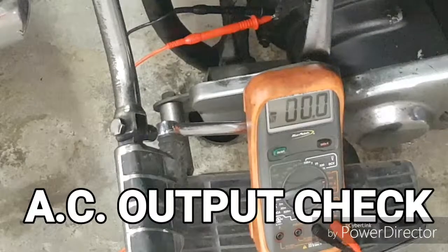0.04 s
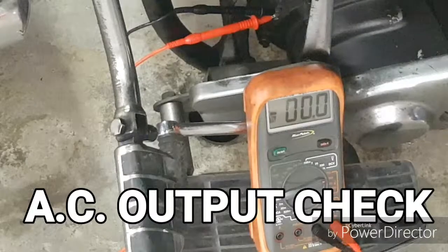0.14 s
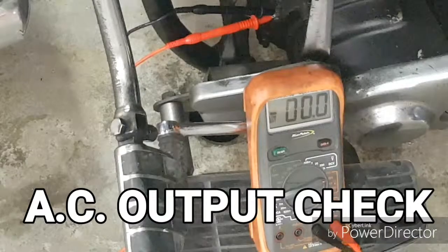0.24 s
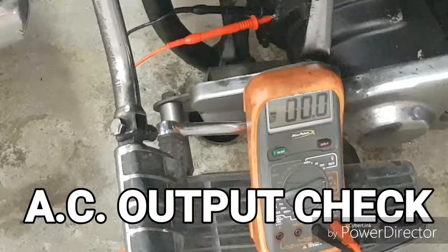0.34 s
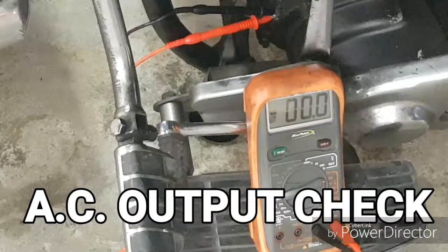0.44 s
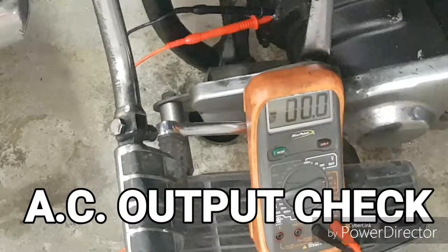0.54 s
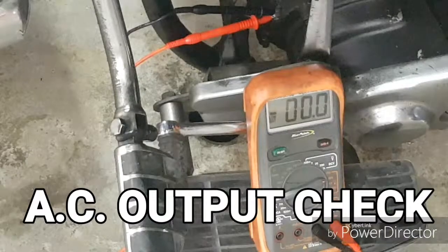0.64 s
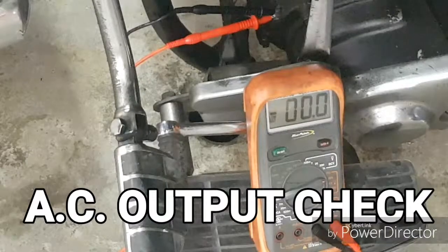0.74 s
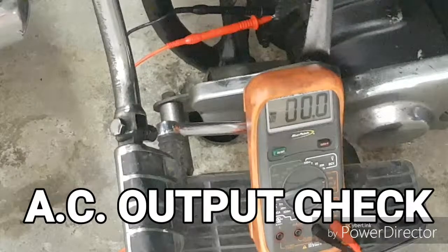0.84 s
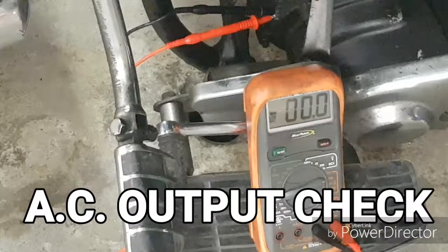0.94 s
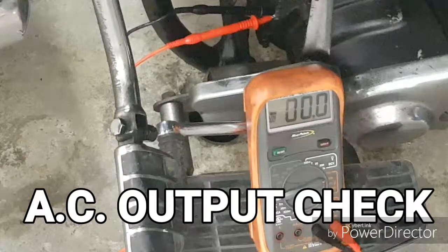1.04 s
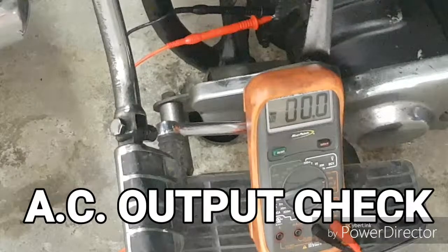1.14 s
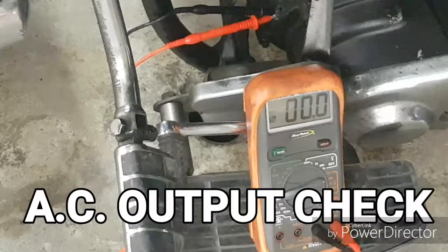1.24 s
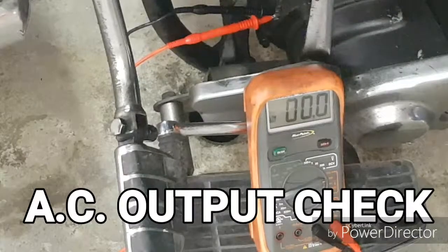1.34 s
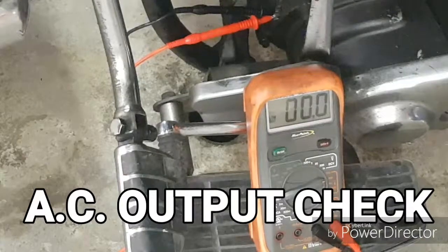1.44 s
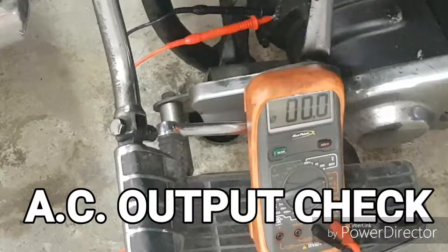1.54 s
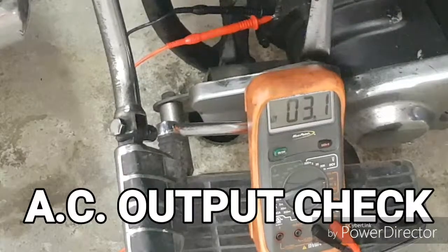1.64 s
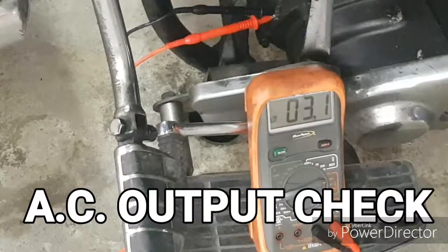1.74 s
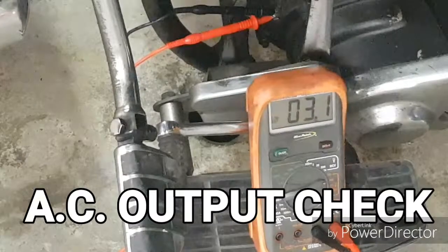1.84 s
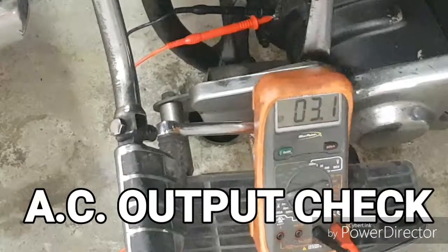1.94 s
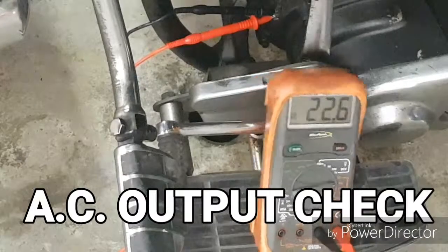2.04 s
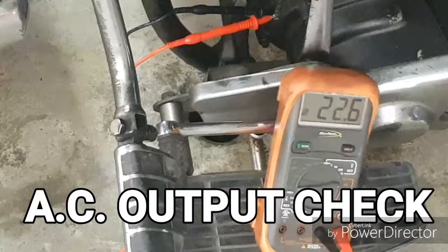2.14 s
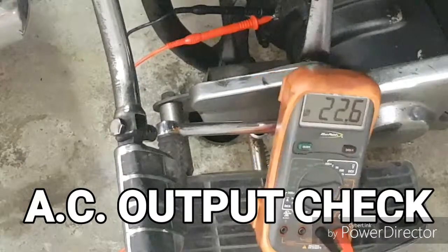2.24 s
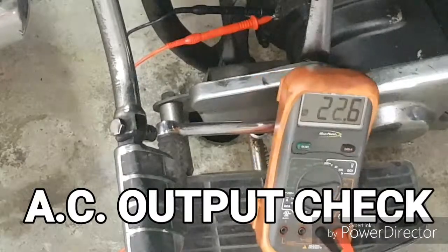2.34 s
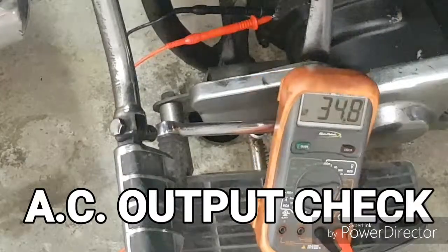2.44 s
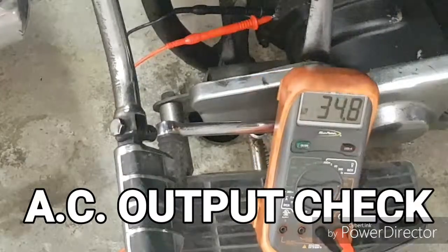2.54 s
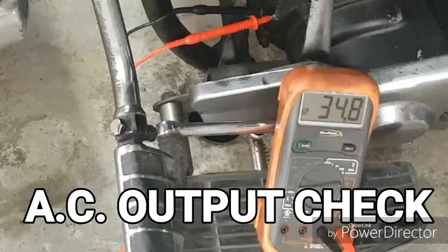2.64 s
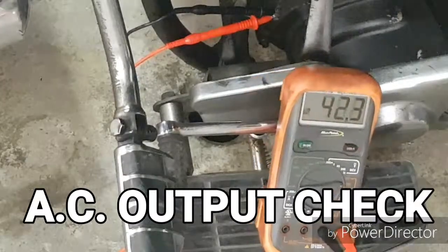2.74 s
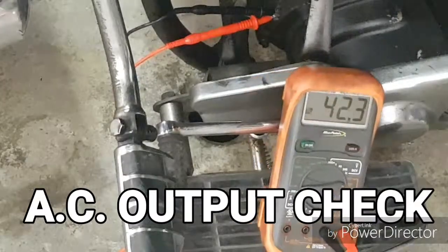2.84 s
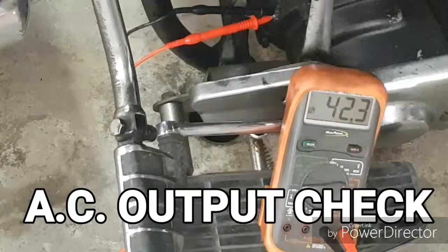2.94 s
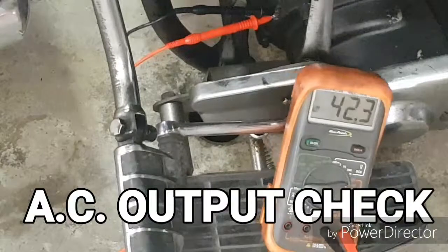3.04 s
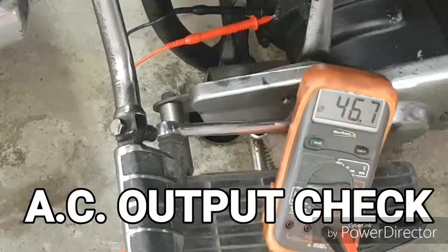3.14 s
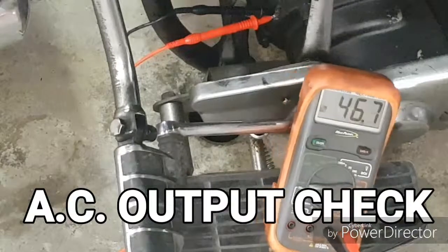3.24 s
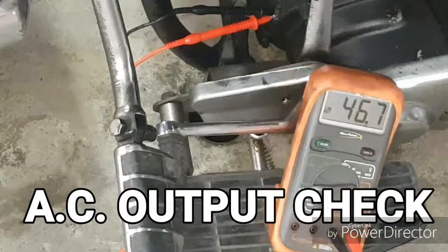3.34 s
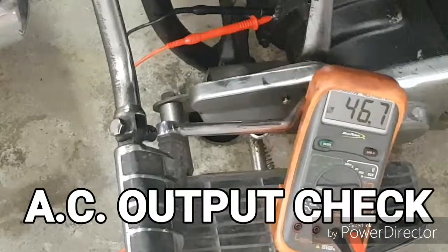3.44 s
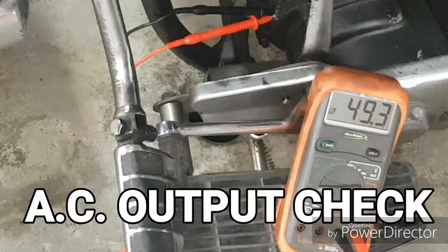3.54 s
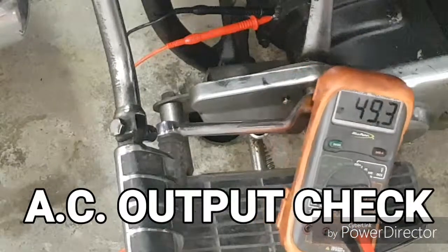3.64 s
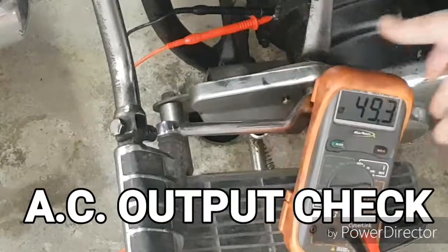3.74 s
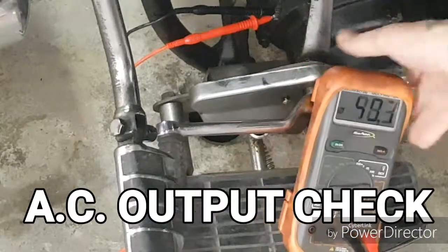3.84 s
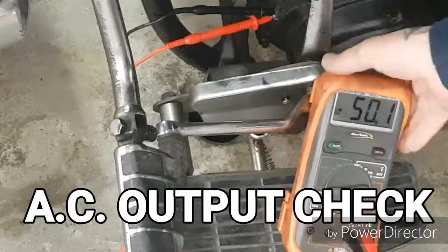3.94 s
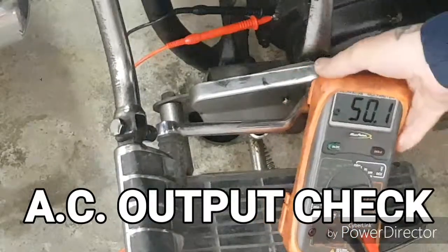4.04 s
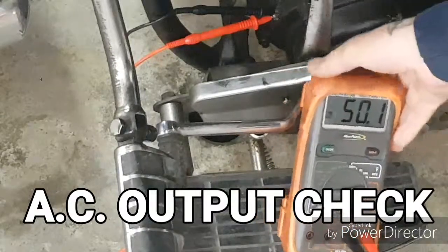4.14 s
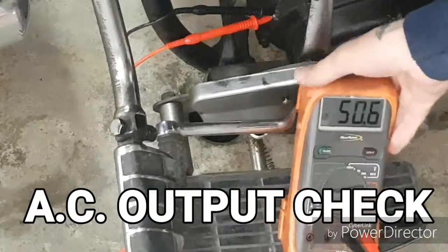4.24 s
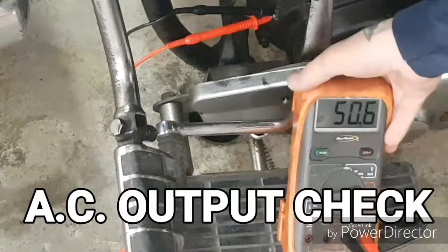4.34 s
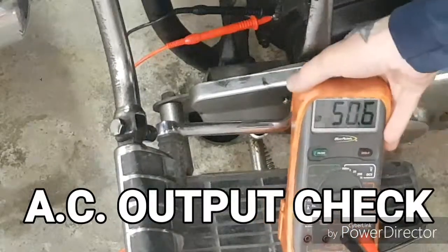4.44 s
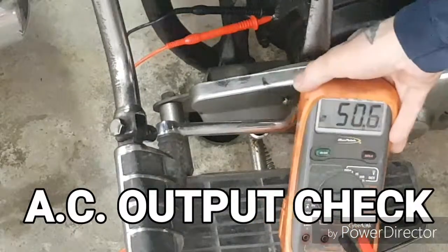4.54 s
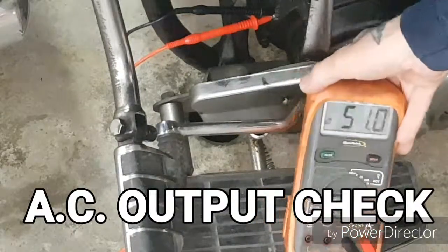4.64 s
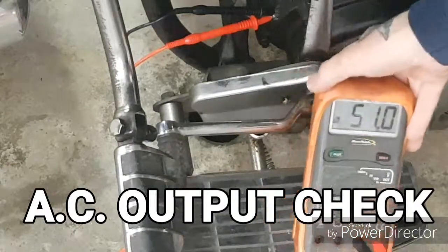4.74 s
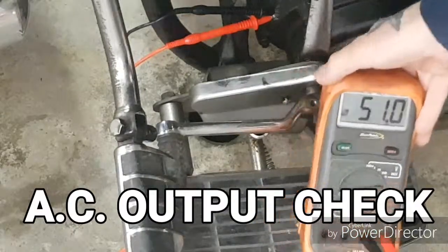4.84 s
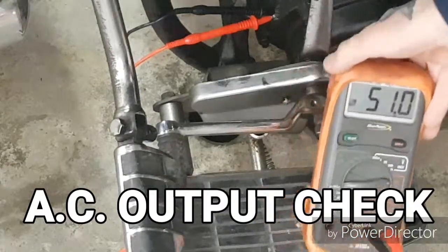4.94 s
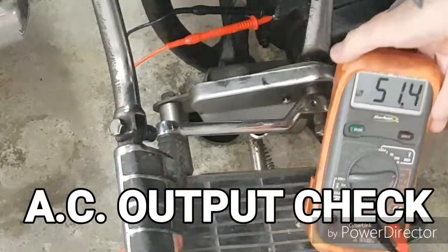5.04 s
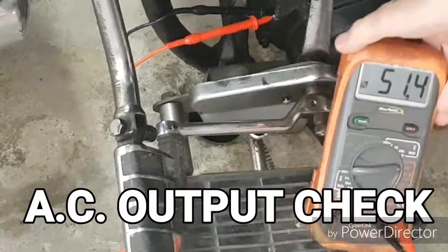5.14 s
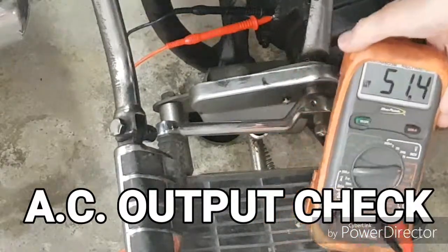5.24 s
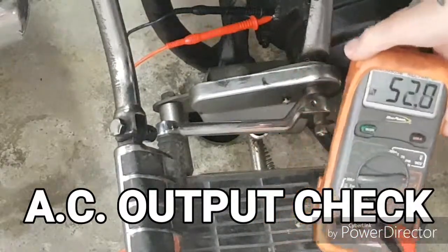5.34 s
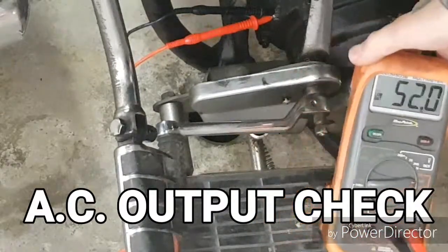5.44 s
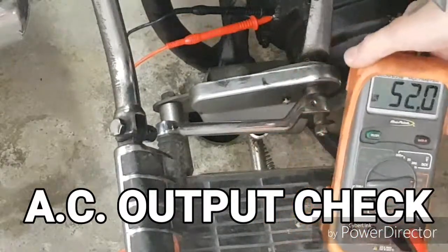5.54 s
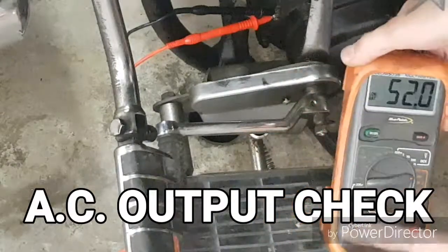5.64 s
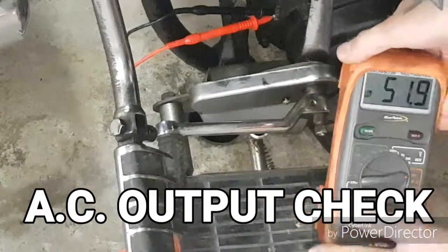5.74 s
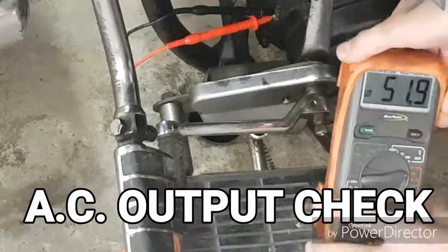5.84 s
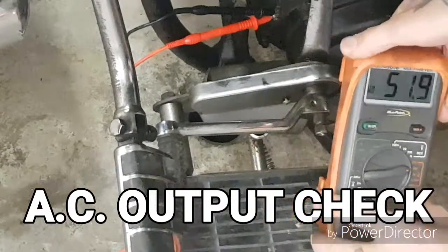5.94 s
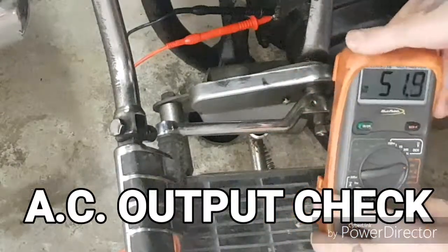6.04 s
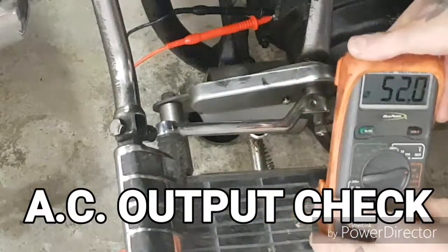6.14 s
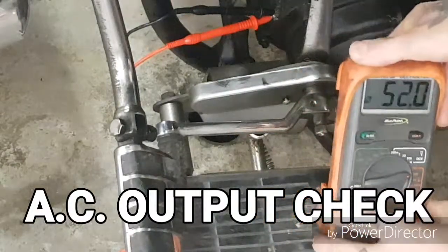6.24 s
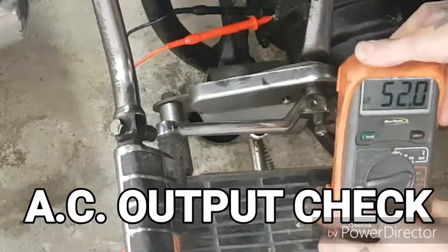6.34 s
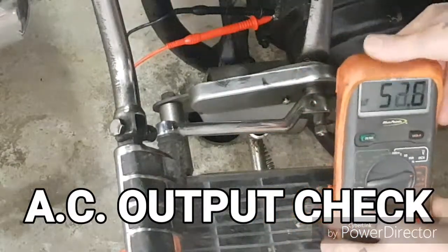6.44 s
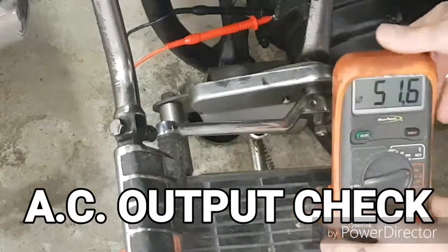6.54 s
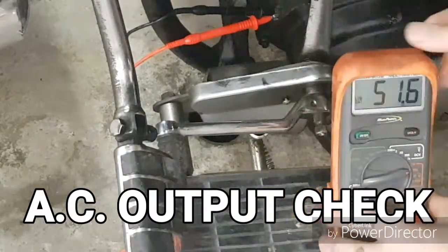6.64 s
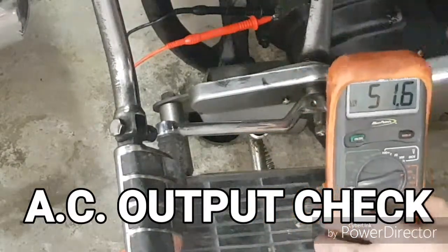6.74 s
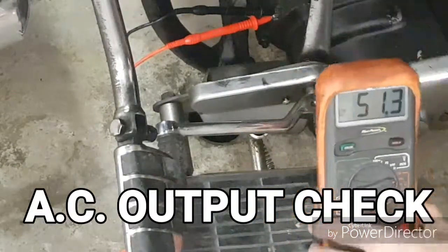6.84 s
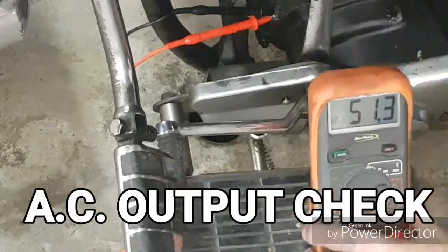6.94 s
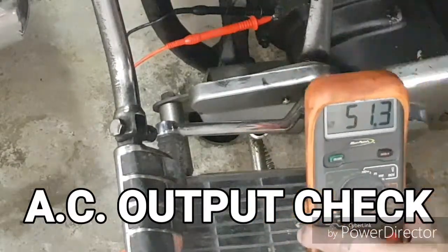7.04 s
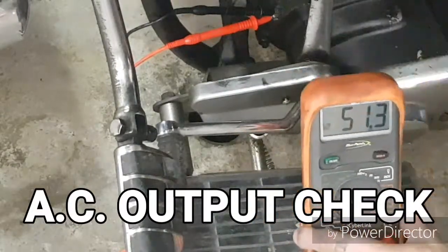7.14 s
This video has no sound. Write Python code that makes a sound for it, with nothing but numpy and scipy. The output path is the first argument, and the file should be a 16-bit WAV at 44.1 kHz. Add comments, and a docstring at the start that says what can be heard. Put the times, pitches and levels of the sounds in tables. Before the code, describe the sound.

For the first 1.15 seconds there is only a quiet garage: low mains hum, still air and a faint fading noise. At about 1.2 a hard double metallic clack engages the starter, which grinds coarsely and growls, its whine dropping under compression and rising again near 1.45 with a short scraping squeal. At 1.65 the four-cylinder motorcycle engine catches with sharp cracks and uneven low thumps, stumbling near 2.0 and 2.3 while air gulps loudly at the intake. Revs climb quickly until about 3.1, then creep up to a fast idle. Deep exhaust boom and drone throb under steady valve clatter, chain ticks, buzzing brackets, ringing covers and hiss. Small irregular firings and knocks come around 5.8 and 6.5, and the speed eases slightly until the sound ends, still running, at about 7.2. Two close microphones, with short wall echo.

```python
"""A four-cylinder motorcycle starts up in a quiet, humming garage, with two microphones close beside the engine.
Uneven firings ring the silencers, while valve gear and chains clatter in the engine case.
The starter clacks in, grinds and whines; the engine catches, stumbles and climbs to a fast idle.
Filtered noise and resonances make the metal, decaying noise the walls, and sines the mains hum."""
import sys
import numpy as np
from scipy import signal
from scipy.fft import rfft, irfft
from scipy.io import wavfile
from scipy.ndimage import uniform_filter1d

SR = 44100
rng = np.random.default_rng(int(sys.argv[2]) if len(sys.argv) > 2 else 0)


def master(y):
    """Save y as 16-bit WAV."""
    cut = np.clip(np.atleast_2d(y).T, -1, 1)
    pcm = np.round(cut * 32767)  # scale
    wavfile.write(sys.argv[1], SR, pcm.astype(np.int16))


N = 317520
TIME = np.arange(N) / SR
FREQ = np.fft.rfftfreq(N, 1 / SR)
CATCH_S = 1.65  # the engine begins to fire

# Engine speed. Each row: time in seconds, four-stroke cycles per second.
ENGINE_SPEED = [(1.65, 8.5), (1.75, 10.7), (1.95, 11.85), (2.12, 11.39), (2.57, 15.12), (2.9, 15.76),
                (3.1, 16.71), (5.05, 17.53), (5.7, 17.55), (6.65, 17.3), (6.9, 17.02), (7.2, 16.93)]
# The firings of one cycle. Each row: place in the cycle from 0 to 1, relative push;
# the far silencer is heard in opposite phase.
FIRINGS = [(.12, -.28), (.37, -.16), (.62, 1.0), (.87, .32)]


def undb(db):
    """Decibels to gain."""
    return 10 ** (np.asarray(db) / 20)


def unit(x):
    """Scale to rms 1."""
    return x / np.sqrt(np.mean(x ** 2))


def steady(x):
    """Scale to rms 1 over every few engine cycles."""
    return x / np.sqrt(uniform_filter1d(x ** 2, size=7700) + 1e-12)


def noise(*channels):
    """White noise of rms 1, independent in each channel."""
    return rng.standard_normal((*channels, N))


def curves(table):
    """Each column of a table, joined by straight lines in time."""
    seconds, *columns = np.transpose(table)
    return [np.interp(TIME, seconds, column) for column in columns]


def colour(points):
    """Causal (minimum-phase) response with the given outline of Hz and dB."""
    hz, db = np.transpose(points)
    outline_db = np.interp(np.log(FREQ + 1), np.log(hz), db)
    # folding the cepstrum forward in time gives the causal phase
    cepstrum = irfft(np.log(undb(outline_db)), N)
    cepstrum[1:N // 2] *= 2
    cepstrum[N // 2 + 1:] = 0
    return np.exp(rfft(cepstrum))


def resonance(hz, width):
    """Band-pass response, gain 1 at the centre."""
    return 1j * FREQ * width / (hz ** 2 - FREQ ** 2 + 1j * FREQ * width)


def through(x, response):
    """Filter by a frequency response."""
    return irfft(rfft(x) * response, N)


def walk(rate):
    """Smooth random wandering with rms 1, taking a new value at the given rate in Hz."""
    k = max(int(SR / rate), 1)
    steps = np.repeat(rng.standard_normal(N // k + 1), k)[:N]
    return unit(uniform_filter1d(steps, k))


def strikes(turns, places, sizes):
    """A pulse each time the running count of turns passes one of the places."""
    at = np.interp(places, turns, np.arange(N), left=-1, right=-1).ravel()
    heard = (at >= 0) & (at < N - 1)
    at, sizes = at[heard], sizes.ravel()[heard]
    # each pulse is shared between the two samples around it
    i = at.astype(int)
    return np.bincount(i, sizes * (1 - at + i), N) + np.bincount(i + 1, sizes * (at - i), N)


def ring(x, t60):
    """Dense ringing as decaying noise, different at each of the two microphones."""
    t = TIME[:SR // 2]
    tail = rng.standard_normal((2, len(t))) * np.exp(-np.log(1000) * t / t60)
    tail = tail[:, :int(2 * t60 * SR)]
    tail = tail / np.sqrt(np.sum(tail ** 2, 1, keepdims=True))
    return signal.oaconvolve(x * np.ones((2, 1)), tail, axes=1)[:, :N]


def fade_in(start, length):
    """Nothing before the start, then a straight rise to 1."""
    return np.clip((TIME - start) / length, 0, 1)


def spell(start, length, ramp):
    """Rises to 1 from the start, holds, and falls back once the length has passed."""
    return fade_in(start, ramp) - fade_in(start + length, ramp)


def since_catch():
    """Seconds for which the engine has been firing."""
    return np.maximum(TIME - CATCH_S, 0)


def settling(seconds):
    """1 until the engine catches, then dying away with this time constant."""
    return np.exp(-since_catch() / seconds)


def combustion(settle_s):
    """Scatter, boom and drone in dB: scatter settles with warmth, and all three shift in stumbles and surges."""
    # Stumbles and surges. Each row: start in seconds, length in seconds, then the change in dB
    # of the scatter, of the boom and of the drone.
    stumbles = [(1.66, 0.1, -1.5, -2, -5), (1.772, 0.2, -1.6, -2, 1.5), (1.952, 0.34, -.7, -.5, -3),
                (2.283, 0.7, -1.1, 1, 1.3), (3.5, 0.92, 0, -2, 2.1), (4.3, .65, .3, -2.5, 0),
                (5.785, .07, 3.5, -1, 0), (6.44, 0.36, 2.8, -1, 0), (6.8, .45, 0.3, -.5, 2)]
    scatter_db, boom_db, drone_db = sum(np.outer(changes, spell(start, length, 0.02))
                                        for start, length, *changes in stumbles)
    warm_db, cold_db = 0.85, 5.5
    return warm_db + cold_db * settling(settle_s) + scatter_db, boom_db - 28.5, drone_db - 24.5


def exhaust(turns, low_cut_hz=38, timing=0.0017, gas_per_scatter=5.3):
    """Four unequal firings a cycle ring the silencers; gas flutters through the same pipes."""
    # Silencer resonances, the first the deep boom. Each row: Hz, width in Hz, relative level in dB
    # (the boom is levelled apart from the others).
    pipe_modes = [(75.4, 9, 0), (129.3, 14, 0), (194.5, 6, -11.5), (208, 8, -23), (259, 8, -12.5),
                  (300, 10, -21.5), (328, 12, -26), (377, 12, -25), (478, 44, -27)]
    settle_s = 0.74
    place, push = np.transpose(FIRINGS)
    chance = rng.standard_normal((int(turns[-1]) + 1, 2, len(place)))
    places = np.arange(len(chance))[:, None] + place
    scatter_db, boom_db, drone_db = combustion(settle_s)
    scatter = np.interp(places, turns, scatter_db)
    # a stumbling engine fires unevenly in both strength and time, and blows more loose gas
    late = timing * scatter * chance[:, 0]
    pulses = strikes(turns, places + late, push + (undb(scatter) - 1) * chance[:, 1] / 2)
    gas = undb(-28 + gas_per_scatter * scatter_db) * noise()
    s = 1j * FREQ / low_cut_hz
    low_cut = s * s / (s * s + np.sqrt(2) * s + 1)
    blast = through(unit(pulses) + gas, low_cut)

    modes = [(-1) ** k * undb(db) * resonance(hz, width) for k, (hz, width, db) in enumerate(pipe_modes)]
    # the two pipes partly cancel each other at one pitch
    notch = 1 - 0.5 * resonance(156, 18)
    boom = steady(through(blast, modes[0] * notch))
    drone = steady(through(blast, sum(modes[1:]) * notch))
    # in one range of speed the silencers boom, at the cost of the drone
    boomy_speed, boomy_range = 16.45, 0.86  # cycles per second
    boomy = np.exp(-((curves(ENGINE_SPEED)[0] - boomy_speed) / boomy_range) ** 6)
    boom = boom * undb(boom_db + 4.5 * boomy)
    drone = drone * undb(drone_db - 1.5 * boomy)
    # a low shudder, heaviest while the engine is cold and slow
    rumble = unit(through(blast, resonance(52, 15) ** 2)) * undb(-43 + 10 * settling(settle_s))
    build_s = 0.1
    return (rumble + boom + drone) * np.sqrt(fade_in(CATCH_S, build_s))


def misfires():
    """Gain of the exhaust: it sags for a moment at each weak firing."""
    # Gaps in the throb. Each row: time in seconds, depth in dB.
    gaps = [(1.755, 4), (2.255, 5), (4.44, 2), (5.875, 0), (6.495, 4.5), (6.79, 4)]
    width_s = 0.018
    return undb(-sum(db * np.exp(-((TIME - s) / width_s) ** 2) for s, db in gaps))


def thumps():
    """An uneven firing swings the gas in the silencers for a few cycles."""
    # Single thumps. Each row: start in seconds, pitch in Hz, level in dB before rise and decay.
    uneven_firings = [(1.714, 124, -21), (1.718, 269, -17), (1.78, 260, -22.5), (1.97, 125, -12),
                      (2.318, 189, -21), (5.832, 158, -14), (6.522, 100, -13), (6.584, 190, -17)]
    rise_s, t60_s = 0.0043, 0.059
    out = np.zeros(N)
    for s, hz, db in uneven_firings:
        age = np.maximum(TIME - s, 0)
        envelope = fade_in(s, rise_s) * np.exp(-np.log(1000) * age / t60_s)
        out += undb(db) * envelope * np.sin(2 * np.pi * hz * age)
    return out


def puffs(pipes, hz=480, width_hz=600):
    """Gas chuffs at the tailpipes on every outward swing of the pressure."""
    gas = np.maximum(pipes, 0) * noise()
    return unit(through(gas, resonance(hz, width_hz) ** 2)) * undb(-43)


def rattle(turns, count, scatter_db, slack, t60, parts_db):
    """Parts that knock at their own places in every cycle, never quite alike."""
    own = rng.standard_normal((count, 2))
    chance = rng.standard_normal((int(turns[-1]) + 1, 2, count))
    own_places = (np.arange(count) + own[:, 0] / 4) / count
    places = np.arange(len(chance))[:, None] + own_places + slack * chance[:, 0]
    sizes = undb(parts_db * own[:, 1] + scatter_db * chance[:, 1])
    # neighbouring knocks come from different parts of the engine and ring differently
    return unit(sum(ring(strikes(turns, places[:, k::8], sizes[:, k::8]), t60) for k in range(8)))


def singing_covers(turns, buzz_db=-5):
    """Each cover rattles softly and coarsely all the time and sings out in spells."""
    # Covers that sing along with the gears. Each name: Hz, width in Hz of one stage, relative resting level in dB.
    covers = {"clutch": (755, 77, -55), "alternator": (1562, 125, -53.5), "valve": (2240, 960, -52),
              "chain": (496, 97, -55), "sump": (864, 120, -54), "side": (1445, 87, -52.5)}
    # Spells of singing. Each row: start in seconds, length in seconds, which cover, rise in dB.
    singing = [(2.43, 0.71, "clutch", 16.5), (4.8, 2.6, "alternator", 12.5), (5.05, 1.86, "valve", 7),
               (1.9, 0.515, "chain", 16.5), (4.4, .65, "chain", 12.5), (4.45, 1.7, "sump", 11),
               (2.95, 1.7, "side", 6), (6.6, .7, "side", 7)]
    knocks = rattle(turns, count=8, scatter_db=3.0, slack=0.01986, t60=0.015, parts_db=-1.5)
    drive = rfft(knocks + undb(buzz_db) * noise(2))
    out = 0
    for name, (hz, width, db) in covers.items():
        rise_db = sum(rise * spell(start, length, 0.087)
                      for start, length, cover, rise in singing if cover == name)
        out = out + unit(irfft(drive * resonance(hz, width) ** 2, N)) * undb(db + rise_db)
    return out


def machinery(turns, running, rush_db=-5, spray_db=1, throb_db=1.0, case_db=-1.58):
    """Valve gear knocks in the case, its covers and fins; chains tick above it; all swell once a cycle."""
    # Broad colour of the engine case. Each row: Hz, dB.
    case_colour = [(90, -25), (170, 0.5), (228, -11), (300, -2), (400, -8), (500, -13), (610, -12),
                   (820, -10.5), (1050, -15.5), (1250, -17.5), (1550, -16), (2400, -20), (3300, -26),
                   (5000, -32.5), (8000, -65.5)]
    # Resonances of the case. Each row: Hz, width in Hz, dB over the colour.
    case_modes = [(752, 68, -6), (1665, 31, -17)]
    # Cooling fins that ring all the while. Each row: Hz, width in Hz of one stage, dB relative to the clatter.
    fin_modes = [(1435, 14, -22.5), (2093, 29, -23.5), (3620, 70, -26.5), (4280, 32, -31)]
    # Fine hiss of chains and intake. Each row: Hz, dB.
    hiss_colour = [(2060, -22), (3500, -7), (5450, -7), (7670, -5), (9300, -12), (11600, -10),
                   (14600, -12.5), (15500, -16.5)]
    # Spells of harder rattling. Each row: start in seconds, length in seconds, rise in dB.
    rattling = [(1.921, 0.14, 0.5), (2.257, 0.31, 1.5), (4.585, 2.2, 0.64)]

    # slow rises in dB per second as the engine warms, and a surplus that fades as the oil arrives
    oil = settling(0.37)
    clatter_db = -29.5 + 0.0139 * since_catch() + 6 * oil
    hiss_db = -49.5 + 0.47 * since_catch() + 9 * oil
    rattling_db = sum(rise_db * spell(start, length, 0.043) for start, length, rise_db in rattling)
    throb = throb_db * np.cos(2 * np.pi * (turns - .4))

    knocks = rattle(turns, count=20, scatter_db=2.0, slack=0.0051, t60=0.048, parts_db=1.14)
    knocks = knocks + undb(rush_db) * noise(2)
    ticks = rattle(turns, count=32, scatter_db=3.2, slack=.005, t60=.02, parts_db=1.2)
    ticks = ticks + undb(spray_db) * noise(2)

    resonances = sum(undb(db) * resonance(hz, width) for hz, width, db in case_modes)
    case = undb(case_db) * unit(through(knocks, colour(case_colour) * (1 + resonances)))
    fins = sum(undb(db) * unit(through(knocks, resonance(hz, width) ** 2)) for hz, width, db in fin_modes)
    body = (case + fins) * undb(clatter_db + rattling_db)
    hiss = unit(through(ticks, colour(hiss_colour))) * undb(hiss_db + rattling_db)
    return (body + singing_covers(turns) + hiss) * undb(throb) * running


def intake(turns, hz=390, width=330, gulp_db=4):
    """The carburettors gulp air once for every cylinder, loudest while the engine picks up."""
    air = unit(through(noise(), resonance(hz, width) ** 2))
    gulps = np.cos(2 * np.pi * len(FIRINGS) * turns) - 1.5
    return air * undb(-42 + 11.5 * settling(0.95) + gulp_db * gulps)


def loose_parts(turns, scatter_db=2.5):
    """Brackets and shields, each with its own note, are shaken twice a cycle; now one rings out, now another."""
    # Notes of the loose brackets and shields. Each row: Hz, width in Hz, relative level in dB.
    loose_notes = [(471, 25, -2), (518, 32, -4.5), (690, 53, -4), (753, 19, 2), (868, 54, -2),
                   (947, 27, -1.5), (1026, 34, -2), (1350, 62, -4), (1486, 51, -5), (1688, 23, -4.5),
                   (1793, 37, -14), (2030, 44, -9.5), (2200, 70, -8.5), (2455, 63, -10)]
    out = np.zeros((2, N))
    for hz, width, db in loose_notes:
        chance = rng.standard_normal((2 * int(turns[-1]) + 2, 3))
        places = (np.arange(len(chance)) + rng.random() + .08 * chance[:, 0]) / 2
        peak = signal.iirpeak(hz, hz / width, SR)
        for side in range(2):
            blows = strikes(turns, places, undb(scatter_db * chance[:, 1 + side]))
            out[side] += undb(db) * unit(signal.lfilter(*peak, blows))
    return unit(out) * undb(-41)


def starter(grit_db=2, tooth_db=3, housing_t60=0.035, housing_ring_db=-4):
    """The starter's gears grind and growl under compression, squeal as they run free, and sink as the engine fires."""
    # Compressions drag the starter down. Each row: time in seconds, gear mesh rate in Hz,
    # level of the whine in dB before the housing and its ring.
    mesh = [(1.208, 1002, -50), (1.219, 975, -28), (1.235, 900, -44), (1.25, 520, -35), (1.28, 430, -38),
            (1.315, 530, -37), (1.365, 390, -41), (1.4, 560, -38), (1.44, 902, -52), (1.458, 948, -31.5),
            (1.497, 980, -26.5), (1.507, 915, -36), (1.517, 870, -29), (1.545, 915, -32), (1.56, 975, -34),
            (1.574, 992, -28.5), (1.595, 950, -29.5), (1.606, 830, -38), (1.618, 735, -33),
            (1.66, 500, -44)]
    # Partials of the whine. Each row: multiple of the mesh rate, relative level in dB.
    whine_partials = [(1, 3.5), (2, 0), (3, -15), (4, -21), (7, -25)]
    # Colour of the grinding. Each row: Hz, dB.
    grind_colour = [(50, -18), (100, -9.5), (220, -3.5), (470, -2.5), (700, -5), (1000, -7.5), (1700, -3.5),
                    (2400, -12), (3300, -22), (5300, -30.5), (7000, -28), (9200, -40), (15000, -46)]
    bite_s, bite_rise_s, release_s, release_fall_s = 1.188, 0.039, 1.65, 0.059
    squeal_s, squeal_length_s = 1.445, 0.183  # the starter clutch squeals just before the catch

    mesh_hz, whine_db = curves(mesh)
    phase = 2 * np.pi * np.cumsum(mesh_hz * (1 + 0.021 * walk(700))) / SR
    # teeth never meet twice alike, so the upper partials break up into bands of noise
    teeth = 0
    for k, db in whine_partials:
        roughness = 0.36 + 0.2 * (k - 1)
        flutter = 1 + roughness * (walk(170) + 1j * walk(170))
        teeth = teeth + undb(db) * np.real(np.exp(1j * round(k) * phase) * flutter)
    teeth = unit(teeth) * undb(whine_db)
    # the housing rings when the mesh rate passes its note
    whine = through(teeth, 1 + undb(-14) * resonance(950, 51))
    housing = undb(housing_ring_db) * ring(teeth, housing_t60)

    grit = noise(2) * undb(grit_db * walk(400) + tooth_db * np.cos(phase))
    grind = unit(through(grit, colour(grind_colour)))
    # the grinding eases after the first bite and partly comes back with the squeal
    squealing = spell(squeal_s, squeal_length_s, 0.02)
    eased = fade_in(bite_s, squeal_s - bite_s) - 0.29 * squealing
    grind = grind * undb(-28 - 4 * eased)
    scrape = unit(through(noise(2) * undb(grit_db * walk(330)), resonance(2620, 1660) ** 2))
    scrape = scrape * undb(-37) * squealing
    engaged = fade_in(bite_s, bite_rise_s) * (1 - fade_in(release_s, release_fall_s))
    return (grind + scrape + whine + housing) * engaged


def clacks(t60=0.061, attack=0.0016, trim_db=-8.0):
    """Short metallic blows: a dull ring of the case and a bright crack."""
    # Clacks of the solenoid, starter clutch, rough firings and slack chains.
    # Each row: start in seconds, level in dB before the trim, brightness in dB.
    metal_blows = [(1.169, -42.5, -5), (1.179, -38, -1), (1.19, -30, -4), (1.195, -16.5, -11),
                   (1.215, -15.5, -9), (1.234, -25.5, 5), (1.386, -29, 2), (1.448, -20, -17),
                   (1.657, -21, -10), (1.678, -20.5, -1), (1.703, -20, -1), (1.727, -21, 7.5),
                   (1.74, -23, 4), (1.861, -26, -7), (1.917, -29, 8), (1.983, -17, -11), (1.999, -23, 1),
                   (2.087, -28, 8), (2.175, -34.5, 12), (2.511, -26, -7), (4.899, -24, -8),
                   (5.734, -24, -9), (6.273, -24, -8), (6.464, -22, -9), (6.575, -15, -7), (6.678, -24, -5),
                   (6.752, -22, -10)]
    dull, bright = np.zeros(N), np.zeros(N)
    for s, db, bright_db in metal_blows:
        decay = np.exp(-np.log(1000) * np.maximum(TIME - s, 0) / t60)
        blow = undb(db + trim_db) * fade_in(s, attack) * decay
        dull += blow
        bright += blow * undb(bright_db)
    case = unit(through(noise(2), resonance(1380, 2070) ** 2))
    crack = unit(through(noise(2), resonance(2600, 2800) ** 2 + resonance(4700, 5900) ** 2))
    return dull * case + 0.5 * bright * crack


def garage(tail_db=-62, tail_db_per_s=70):
    """Mains hum, its upper partials wavering, over still air and a low drone; a faint noise fades at first."""
    # Mains hum. Each row: Hz, relative rms level in dB.
    hum_partials = [(120, -80), (240, -71.5), (360, -94), (480, -90), (540, -98), (600, -93), (720, -87.5),
                    (840, -95), (1080, -91), (1440, -89), (2160, -93)]
    # Colour of the still air. Each row: Hz, dB.
    air_colour = [(15, -40), (25, -4), (49, -4), (118, -3.5), (186, -8), (237, -9), (286, -10.5),
                  (427, -18.5), (709, -22), (903, -25.5), (1460, -24), (3500, -31.5), (8780, -44),
                  (15000, -41)]
    hum = 0
    for hz, db in hum_partials:
        waver_db = 0.8 * hz / 1000 * walk(9)
        hum = hum + np.sqrt(2) * undb(db + waver_db) * np.sin(2 * np.pi * (hz * TIME + rng.random()))
    air = unit(through(noise(2), colour(air_colour))) * undb(-69.5 + walk(5.5))
    drone = unit(through(noise(), resonance(110, 12))) * undb(-77)
    tail = unit(through(noise(2), resonance(970, 3600) ** 3)) * undb(tail_db - tail_db_per_s * TIME)
    return hum + air + drone + tail


def close_pair(x, apart_hz=900, side_db=0.0, lean_db=2.0, cross_hz=6500):
    """Two close microphones share the bass; the left hears more middle, the right more top."""
    width = undb(side_db) * FREQ / np.hypot(FREQ, apart_hz)
    mid = 0.98 * (x[0] + x[1]) / np.sqrt(2)
    side = through((x[0] - x[1]) / np.sqrt(2), width)
    lean = lean_db * np.tanh((cross_hz - FREQ) / 1500) * FREQ / (FREQ + 200)
    return np.array([through(mid + side, undb(lean / 2)), through(mid - side, undb(-lean / 2))])


def scene(room_db=-8, exhaust_db=0, metal_db=-0.83, pipe_room_db=-14, wobble=0.00084, garage_db=-1.5):
    """Engine, starter and garage together, with the bike echoing off the walls."""
    # the crank never turns quite evenly
    turns = np.cumsum(curves(ENGINE_SPEED)[0]) / SR + wobble * walk(30)
    running = fade_in(CATCH_S, 0.01)
    # the silencers round off the strongest pulses
    pipes = undb(exhaust_db) * np.tanh(3 * (exhaust(turns) * misfires() + thumps())) / 3
    pipes = pipes + puffs(pipes)
    metal = machinery(turns, running) + (intake(turns) + loose_parts(turns)) * running
    metal = undb(metal_db) * (metal + starter() + clacks())
    garage_t60_s = 0.37
    walls = ring(undb(room_db) * metal + undb(pipe_room_db) * pipes, garage_t60_s)
    # the exhaust reaches the right microphone a moment before the left
    delay_s = 0.00017
    pipes = np.array([through(pipes, np.exp(-2j * np.pi * FREQ * delay_s)), pipes])
    bike = pipes + close_pair(metal + walls, apart_hz=1240)
    switched_on = fade_in(1.15, .01)  # the bike is silent until then
    return bike * switched_on + close_pair(undb(garage_db) * garage())


def record(dry):
    """The recorder cuts the deepest bass and the top."""
    dry = signal.sosfilt(signal.butter(2, 14, "high", fs=SR, output="sos"), dry)
    return signal.sosfilt(signal.ellip(10, .2, 80, 15550, fs=SR, output="sos"), dry)


dry = scene()
out = record(dry)
master(out)
```